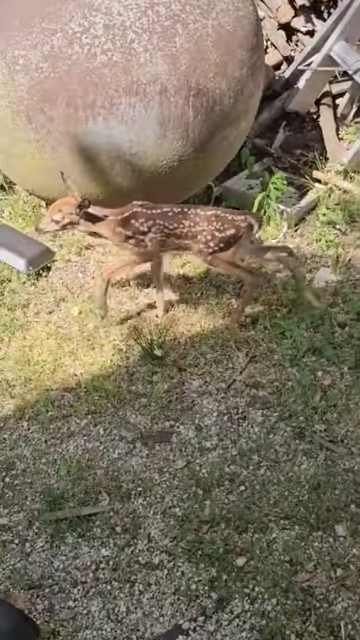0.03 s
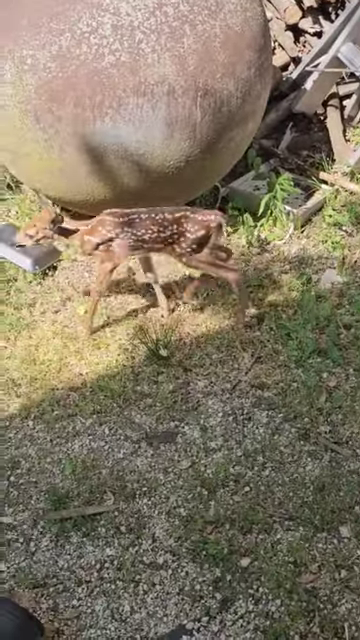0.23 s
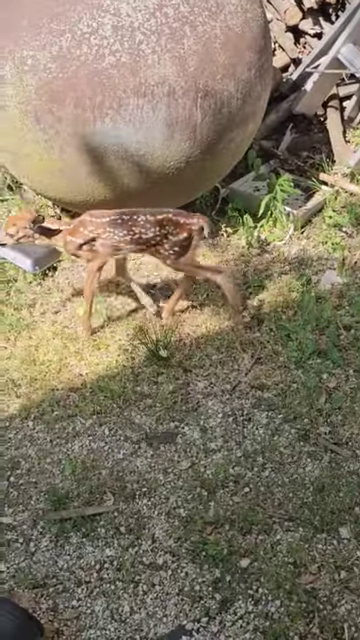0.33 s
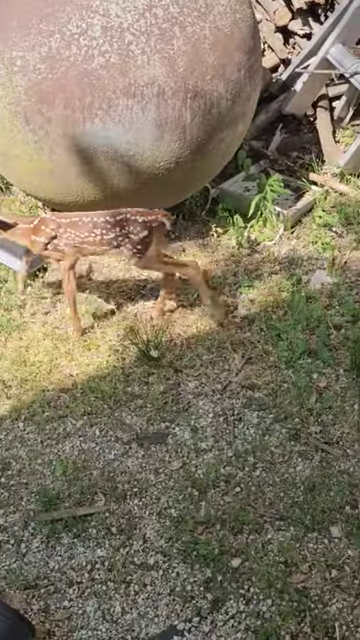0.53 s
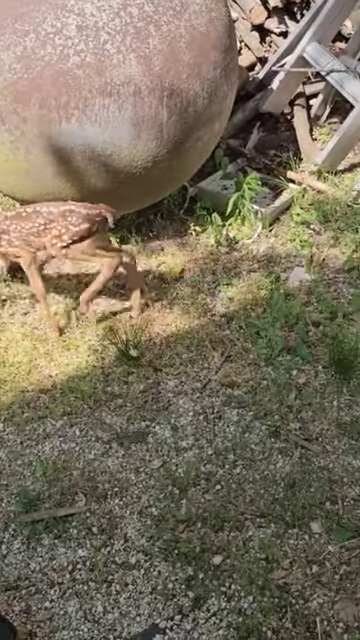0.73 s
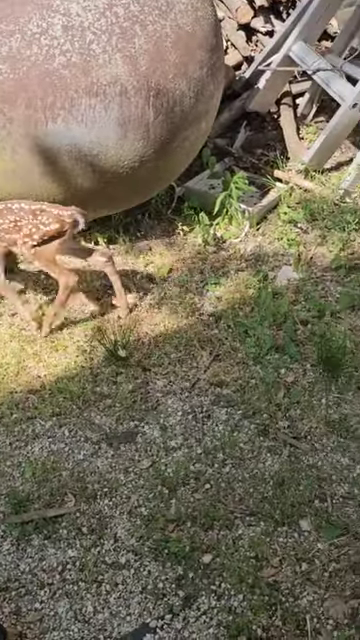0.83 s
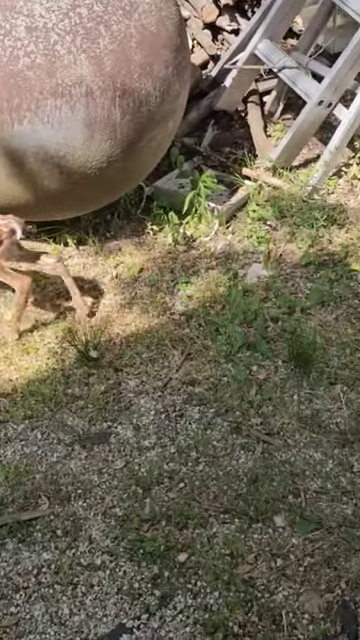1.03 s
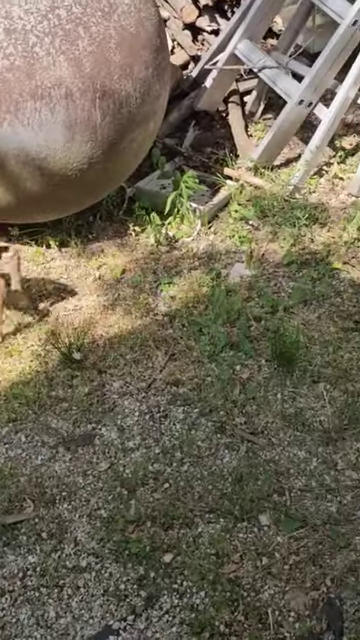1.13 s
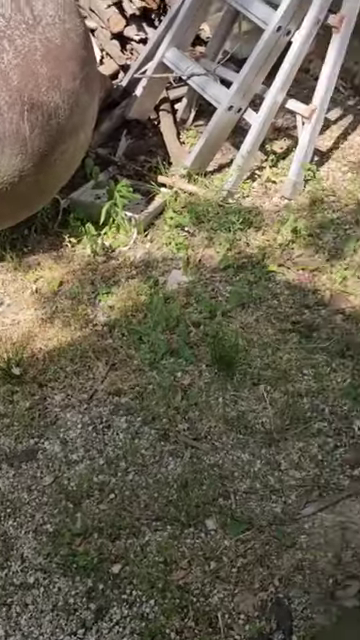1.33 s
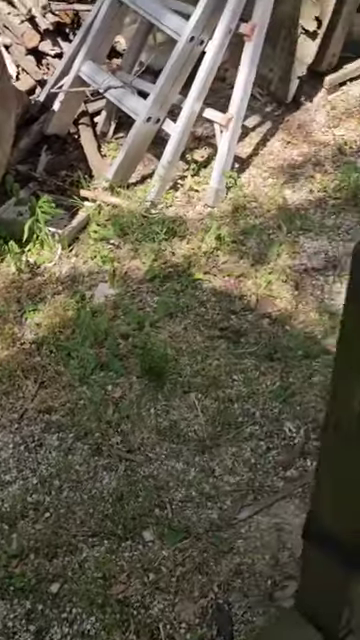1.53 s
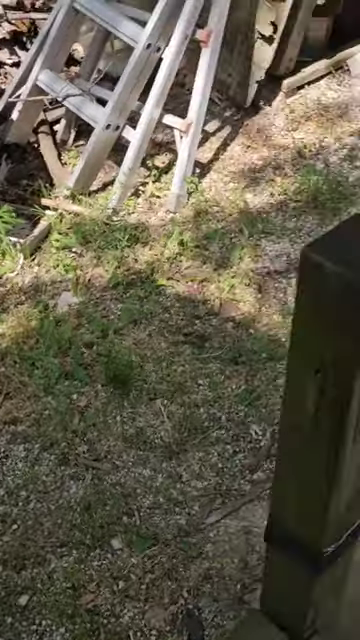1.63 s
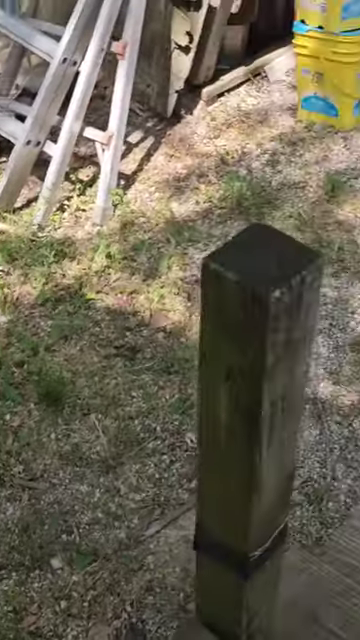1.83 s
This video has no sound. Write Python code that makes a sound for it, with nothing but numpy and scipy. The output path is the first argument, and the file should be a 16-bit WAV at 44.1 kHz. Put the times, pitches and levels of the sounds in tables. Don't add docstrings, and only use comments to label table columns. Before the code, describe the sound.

One brief, clear fawn bleat with short reflections off nearby walls, over soft rumble and hiss; then dull thumps shake the handheld microphone, gravel knocks underfoot, grass rustles, and a distant bird pipes faintly.

```python
import sys
import numpy as np
from scipy import signal
from scipy.fft import rfft, irfft, next_fast_len
from scipy.io import wavfile
from scipy.ndimage import uniform_filter1d, map_coordinates

SR = 44100
rng = np.random.default_rng(int(sys.argv[2]) if len(sys.argv) > 2 else 0)


def log_audio(samples):
    frames = np.atleast_2d(samples).T
    limited = np.clip(frames, -1, 1)
    pcm = np.round(limited * 32767).astype(np.int16)
    wavfile.write(sys.argv[1], SR, pcm)


def ratio_of_db(decibels):
    return 10 ** (np.asarray(decibels, float) / 20)


N = 83790
T = np.arange(N) / SR

# f/Hz, level/dB
RUMBLE_SPECTRUM = [(12, -43), (20, -7.5), (53, 7), (92, -1.5), (234, -12.5), (317, -16.5), (356, -26.5),
                   (420, -46), (550, -70), (920, -120)]
# f/Hz, level/dB
AIR_SPECTRUM = [(200, -41.5), (330, -7.5), (650, -4.5), (1450, -7.5), (2600, -14.5), (6800, -16),
                (7900, -34.5), (10500, -36)]
# f/Hz, level/dB
HISS_SPECTRUM = [(9500, -46), (10600, -8.5), (11600, 2.5), (13000, -4.5), (15500, -4)]
# f/Hz, correlation/1
PORT_LIKENESS = [(60, 1), (180, 0.79), (550, 0.3), (1650, 0.016), (4970, 0.036), (15000, 0.043)]
# f/Hz, left over right/dB
NOISE_SIDE = [(100, 5.5), (330, 0), (700, 9.5), (1400, 11.5), (2400, 7.5), (4400, -4.5), (8000, -5),
              (15000, 0)]
# t/s, level/dB
INSECT_LEVEL = [
    (0, -57),
    (.6, -57),
    (.83, -58.5),
    (.99, -71.5),
    (1.05, -79),
]
# t/s, level/dB, body f/Hz, sharp push/dB
FOOTFALLS = [(0.067, -38.5, 94, -22), (0.141, -40.5, 79, -20), (0.196, -35, 54, -38),
             (0.216, -41.5, 63, -27), (0.399, -31.5, 63, -1), (0.721, -41.5, 77, -38),
             (0.958, -39.5, 80, 11.5), (1.146, -29, 95, 10.5), (1.4328, -38, 75, 8),
             (1.5287, -28.5, 89, 1.5), (1.558, -38, 85, 10.5), (1.5954, -36, 72, -3),
             (1.6105, -30.5, 58, -12), (1.07, -43, 85, -23), (1.702, -37.5, 50.5, -11),
             (1.776, -36, 61.5, -30.5)]
# t/s, effort/dB, mouth 0 narrow to 1 wide, shrillness/dB, head turned left/dB
BLEAT_COURSE = [
    (.165, -31, 0.17, -13, 21),
    (.21, -15.5, 0.53, -6, -2.5),
    (0.231, -4.5, .25, 0, -6.5),
    (0.303, 2, 0.47, -4, 6.5),
    (.334, 2.5, 0.55, -6.5, 1.5),
    (0.387, -1, 0.59, -3.5, -5.5),
    (0.452, -5, 0.89, -1.5, -10.5),
    (.48, -10.5, 0.9, 0, 3.5),
    (0.539, -15.5, 0.85, -6, 5),
]
# t/s, f/Hz
PITCH_COURSE = [
    (.165, 570),
    (.308, 613.5),
    (.347, 607),
    (.372, 614),
    (.402, 601),
    (.443, 596),
    (.49, 547),
    (.54, 468),
]
# t/s, multiple of the pitch, level/dB
PARTIAL_SWAYS = [(.2, 5, -14), (.2, 6, -12), (.2, 7, 0), (.25, 6, -14), (.25, 8, -3.5), (.262, 7, -6),
                 (.28, 9, -12), (.298, 10, -3), (.305, 11, -8), (.345, 5, -7.5), (.348, 7, -7), (.34, 9, -0.5),
                 (.4, 9, -4.5), (.4, 12, -12), (.422, 4, -11), (.44, 7, -11), (.46, 9, -8.5), (.525, 2, -5),
                 (.43, 5, -6), (.515, 7, 5), (.23, 16, 8), (.228, 20, 6)]
# multiple of the pitch, level/dB
NARROW_MOUTH = [(1, -23), (2, -12.5), (3, -23), (4, -22), (5, -3), (6, -34), (7, -6.5), (8, -1.5),
                (9, -13.5), (10, -15.5), (11, -28.5), (12, -9.5), (13, -35.5), (14, -40.5), (15, -42),
                (16, -49), (17, -54), (18, -35), (19, -24.5), (20, -53.5)]
# multiple of the pitch, level/dB
WIDE_MOUTH = [(1, -34), (2, -22.5), (3, -29), (4, -29), (5, -27.5), (6, 0), (7, -12.5), (8, 0.5), (9, -3),
              (10, -12), (11, -15.5), (12, -40.5), (13, -37.5), (14, -53.5), (15, -37), (16, -33),
              (17, -43.5), (18, -39), (19, -37), (20, -33)]
# multiple of the pitch, level/dB
TOP_PARTIAL = (23.6, -53.5)
# f/Hz, share/1
HEAD_TURN_SHARE = [(600, .2), (1200, 1.3), (1800, .2), (3700, .3), (4900, 1.4), (6200, 0.28)]
# f/Hz, left over right/dB
CALL_TILT = [(600, 6), (1200, -7.5), (1800, -7), (3000, -11.5), (3700, -1.5), (4900, -10), (6100, -16.5),
             (14000, -7)]
# delay/ms, left level/dB, right level/dB
WALL_ECHOES = [(3.12, -10.5, -22.5), (6.663, -8, -12), (11.25, -22.5, -26), (17.65, -12.5, -11),
               (28.45, -10, -19.5), (59.5, -21.5, -21), (104, -26, -27)]
# f/Hz, t60/s
YARD_DECAY = [(500, 0.14), (2000, 0.26), (5000, 0.38), (12000, 0.29)]
# t/s, level/dB, stone f/Hz, snap/dB, rise/ms
STONES = [
    (0.353, -50, 855, 7, .4),
    (0.9567, -35, 693, -6.5, 0.33),
    (1.4406, -40, 710, 4.5, 0.24),
    (1.5276, -26, 675, -27, 3.2),
    (1.5552, -36.5, 557, -3, .4),
]
# t/s, level/dB, f/Hz
STONE_CHIPS = [(.9572, -44, 2500), (.9572, -44, 4400), (.957, -42, 330), (1.4408, -42, 1700),
               (1.4404, -46, 3600), (1.529, -40, 400), (1.5558, -46, 1400), (1.601, -46, 280)]
# f/Hz, level/dB
SNAP_SPECTRUM = [(500, -24), (1500, -1.5), (3000, -7.5), (4800, -2), (6500, -6), (8500, -30), (11500, -29),
                 (15000, -33)]
# t/s, length/s, level/dB
GRASS_RUSTLES = [(0.482, 0.017, -52), (0.718, 0.029, -64.5), (0.891, 0.015, -67), (0.915, 0.065, -64.5),
                 (1.143, 0.039, -65), (1.252, 0.0114, -63), (1.264, 0.026, -57), (1.316, 0.015, -64.5),
                 (1.392, 0.026, -63.5), (1.495, 0.065, -62.5), (1.642, 0.091, -61.5), (1.843, 0.027, -58)]
# f/Hz, level/dB
GRASS_SPECTRUM = [(1760, -26), (3000, -4), (6210, 3), (9310, -23), (9770, -26), (10000, -29), (11000, -6),
                  (15500, -10)]
# f/Hz, level/dB
SOLE_SPECTRUM = [(210, -5), (350, -13), (416, -21), (687, -9.5), (1160, -24), (1350, -20), (3500, -30.5),
                 (4550, -35.5), (7700, -120)]
# t/s, length/s, f/Hz, level/dB
BIRD_NOTES = [
    (1.093, .02, 2520, -63),
    (1.096, 0.069, 2170, -60),
    (1.262, .03, 2120, -57.5),
    (1.296, .05, 2040, -65),
    (1.711, .06, 2100, -66),
]


def unit(x):
    return x / np.sqrt(np.mean(x ** 2) + 1e-20)


def along(points, hz):
    f, v = np.transpose(points)
    return np.interp(np.log(hz + 1), np.log(f + 1), v)


def wobble(rate, channels=1):
    knots = rng.standard_normal((channels, int(N * rate / SR) + 4))
    return np.array([map_coordinates(k, [T * rate]) for k in knots])


def filtered(x, response):
    m = next_fast_len(N + SR // 2)
    return irfft(rfft(x, m) * response(np.fft.rfftfreq(m, 1 / SR)), m)[..., :N]


def ports(x, side):
    return filtered(x, lambda hz: ratio_of_db(np.outer([.5, -.5], along(side, hz))))


def rush(spectrum):
    def mid_side(hz):
        turn = np.arccos(np.clip(along(PORT_LIKENESS, hz), -1, 1)) / 2
        return ratio_of_db(along(spectrum, hz)) * [np.cos(turn), np.sin(turn)]
    mid, side = filtered(rng.standard_normal((2, N)), mid_side)
    return unit(ports(np.array([mid + side, mid - side]), NOISE_SIDE).T).T


def bump(start, length):
    u = np.clip((T - start) / length, 0, 30)
    return (2 * u) ** 2 * np.exp(2 - 4 * u)


def ring(start, hz, t60, rise):
    t = np.clip(T - start, 0, 1)
    return np.sin(2 * np.pi * hz * t) * ratio_of_db(-60 * t / t60) * (1 - np.exp(-t / rise))


def background():
    rumble = ratio_of_db(-46 + 1.8 * wobble(21.0)) * rush(RUMBLE_SPECTRUM)
    air = ratio_of_db(-59 + .7 * wobble(13.0)) * rush(AIR_SPECTRUM)
    hiss = ratio_of_db(-72.5 + 0.57 * wobble(8.9)) * rush(HISS_SPECTRUM)
    return rumble + air + hiss


def insect():
    centre_hz, width_hz, wing_hz = 5363, 270, 130
    swell_hz, crest_s, swell_db = 8.8, 0.67, 4.5
    swell = swell_db * np.cos(2 * np.pi * swell_hz * (T - crest_s))
    strokes = (1 + .3 * np.sin(2 * np.pi * wing_hz * T)) * ratio_of_db(2 * wobble(25.7) + swell)
    band = lambda hz: 1 / (1 + ((hz - centre_hz) * 2 / width_hz) ** 4)
    buzz = unit(filtered(rng.standard_normal(N), band))
    level = ratio_of_db(np.interp(T, *np.transpose(INSECT_LEVEL)))
    return level * strokes * buzz * [[-ratio_of_db(-14.0)], [ratio_of_db(0.5)]]


def steps():
    swing_t60_s, swing_rise_s, swing_pan_db = 0.098, 0.0025, 7.5
    push_hz, push_after_s, push_lead_s, push_pan_db = 196, 0.0026, 0.0015, 5

    def push_at(s):
        u = (np.pi * push_hz * (T - s)) ** 2
        return (1 - 2 * u) * np.exp(-u)
    swing = sum(ratio_of_db(db) * ring(s, hz, swing_t60_s, swing_rise_s) for s, db, hz, _ in FOOTFALLS)
    push = [sum(ratio_of_db(db + sharp) * push_at(s + push_after_s - lead) for s, db, _, sharp in FOOTFALLS)
            for lead in (0, push_lead_s)]
    swing = 2 * swing * ratio_of_db([[swing_pan_db / 2], [-swing_pan_db / 2]])
    return swing + push * np.array([[1], [ratio_of_db(-push_pan_db)]])


def fawn():
    scoop_hz, scoop_s = 140.8, .045
    sway_s, fade_s, shrill_hz = 0.014, .03, 4950
    catch_s, catch_db = .198, -14
    s, *cols = np.transpose(BLEAT_COURSE)
    effort_db, mouth, shrill_db, turn_db = [uniform_filter1d(np.interp(T, s, c), size=300) for c in cols]
    mouth = np.clip(mouth, 0, 1)

    pitch = uniform_filter1d(np.interp(T, *np.transpose(PITCH_COURSE)), size=400)
    pitch = pitch - scoop_hz * np.exp(-(np.clip(T - s[0], 0, 1) / scoop_s) ** 2)
    phase = 2 * np.pi * np.cumsum(pitch * (1 + .0013 * wobble(59.2)[0])) / SR
    k = np.arange(1, 26)[:, None]
    hz = k * pitch

    top_pitch = np.array(PITCH_COURSE)[:, 1].max()
    colour = lambda table: along([(n * top_pitch, db) for n, db in table + [TOP_PARTIAL]], hz)
    db = (1 - mouth) * colour(NARROW_MOUTH) + mouth * colour(WIDE_MOUTH)
    db = db + effort_db * (1 + 0.47 * np.log2(np.clip(k, 2.4, 9) / 4))
    db = db + shrill_db / (1 + (shrill_hz / hz) ** 12)
    db = db + sum(depth * (k == round(n)) * np.exp(-((T - at) / sway_s) ** 2) for at, n, depth in PARTIAL_SWAYS)
    db = db + catch_db * (k > 2) * np.clip((catch_s - T) / .006 + 1, 0, 1)

    breath = 1 + ratio_of_db(-35.5) * (1 + (k / 7) ** 3) * wobble(330, channels=len(k))
    start = k * phase + rng.uniform(0, 2 * np.pi, k.shape)
    heard = []
    for side in (1, -1):
        turned_db = side * turn_db * along(HEAD_TURN_SHARE, hz) / 2
        shimmer_db = 2 * wobble(24, channels=len(k))
        drift = .35 * wobble(13, channels=len(k))
        heard.append(ratio_of_db(db + turned_db + shimmer_db) * breath * np.sin(start + drift))
    gate = (T > s[0]) * np.clip((s[-1] - T) / fade_s + .5, 0, 1)
    return ratio_of_db(-20.5) * np.sum(heard, axis=1) * gate


def yard(x):
    port_lag_ms = 0.054
    ms, *db = np.transpose(WALL_ECHOES)
    gains = np.array([[1], [-1]]) ** np.arange(len(ms)) * ratio_of_db(db)

    def paths(hz):
        direct = np.exp(-2j * np.pi * np.outer([port_lag_ms / 1000, 0], hz))
        return direct + gains @ np.exp(-2j * np.pi * np.outer((ms - port_lag_ms) / 1000, hz))
    early = filtered(x, paths)
    hz, t, z = signal.stft(rng.standard_normal((2, SR // 2)), SR, nperseg=256)
    tail = signal.istft(z * ratio_of_db(-60 * t / along(YARD_DECAY, hz)[:, None]), SR, nperseg=256)[1]
    late_call = np.pad(x.mean(axis=0), (700, 0))[None]
    late = signal.fftconvolve(late_call, tail / np.linalg.norm(tail[0]), axes=1)[:, :N]
    return ports(early + ratio_of_db(-11) * late, CALL_TILT)


def gravel():
    stone_t60_s, snap_t60_s = .011, 0.0082
    noise = rng.standard_normal((2, N)) + 0.88 * rng.standard_normal(N)
    knock = sum(ratio_of_db(db) * ring(s, hz, stone_t60_s, rise / 1000) for s, db, hz, _, rise in STONES)
    snap = sum(ratio_of_db(db + sharp - 60 * np.clip(T - s, 0, 1) / snap_t60_s) * (T >= s)
               for s, db, _, sharp, _ in STONES)
    chips = sum(ratio_of_db(db) * ring(s, hz, stone_t60_s, .0003) for s, db, hz in STONE_CHIPS)
    snap = filtered(2.93 * snap * noise, lambda hz: ratio_of_db(along(SNAP_SPECTRUM, hz)))
    return 3 * chips + 3 * knock * ratio_of_db([[3.5], [-5.5]]) + snap * ratio_of_db([[-1.5], [1.5]])


def grass():
    scuff_s, scuff_length_s, scuff_db = 1.65, 0.1, -50
    grain = ratio_of_db(2.5 * wobble(320))
    swells = sum(ratio_of_db(db) * bump(s, length) for s, length, db in GRASS_RUSTLES)
    blades = rush(GRASS_SPECTRUM) * ratio_of_db([[-2.5], [2.5]]) * swells
    stroke = np.exp(-((T - scuff_s - scuff_length_s / 2) * 2 / scuff_length_s) ** 4)
    scuff = ratio_of_db(scuff_db + 2.3 * wobble(71)) * rush(SOLE_SPECTRUM) * stroke
    return grain * blades + scuff


def bird():
    notes = 0
    for s, length, hz, db in BIRD_NOTES:
        t = T - s
        sag = 1 - 0.0257 * t / length / 2
        notes = notes + ratio_of_db(db) * bump(s, length) * np.sin(2 * np.pi * hz * t * sag)
    return notes * (1 + wobble(150, channels=2)) * ratio_of_db([[-6], [-3]])


def scene():
    return background() + insect() + steps() + yard(fawn()) + gravel() + grass() + bird()


def top_cut(x):
    return signal.sosfilt(signal.butter(12, 15620, fs=SR, output="sos"), x)


def record(dry):
    mix = filtered(dry, lambda hz: hz < 15500)
    return top_cut(mix)


dry = scene()
out = record(dry)
log_audio(out)
```